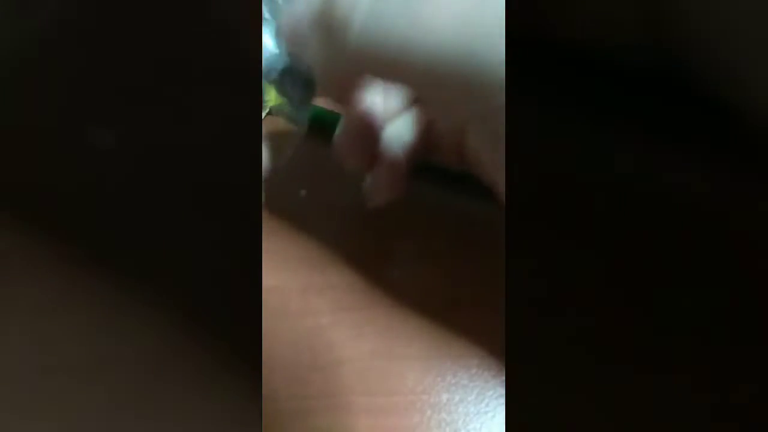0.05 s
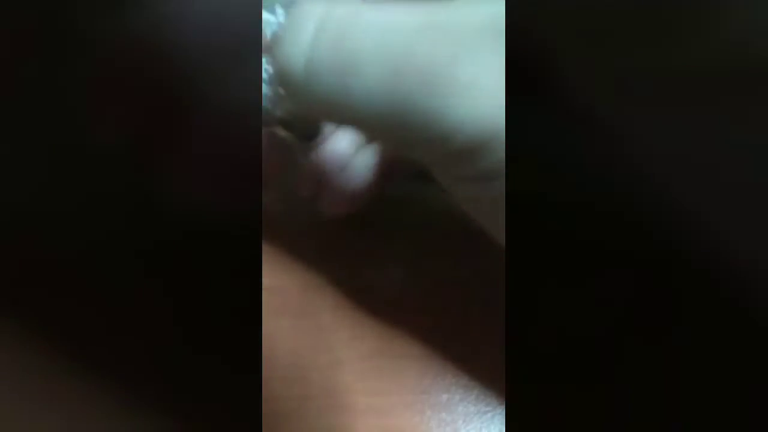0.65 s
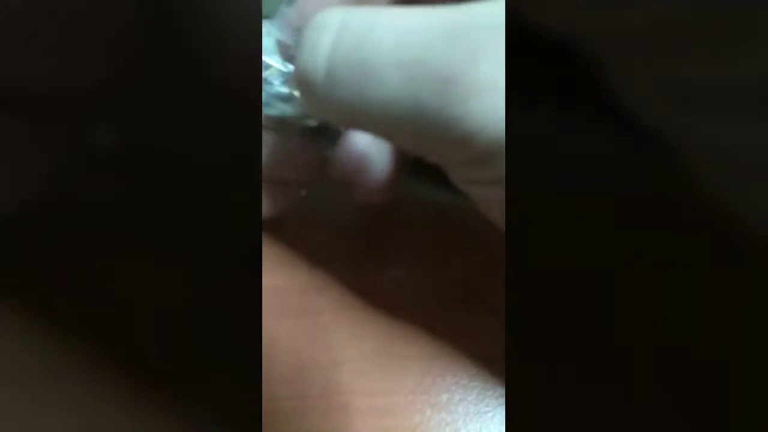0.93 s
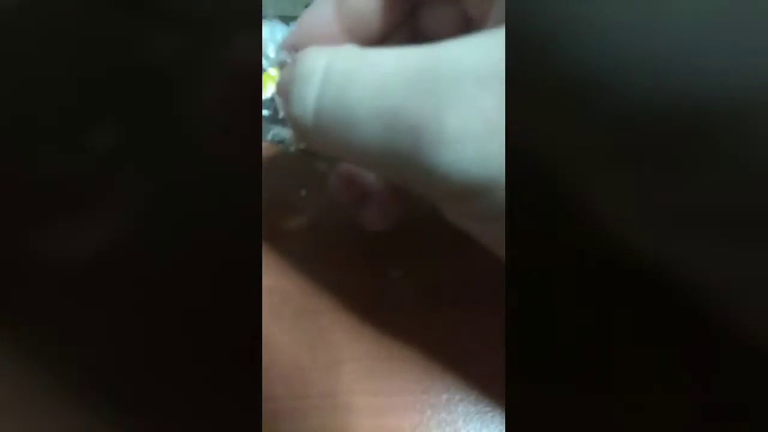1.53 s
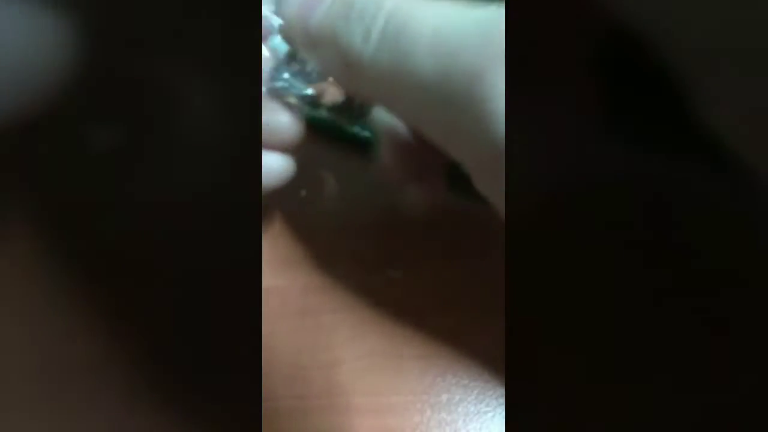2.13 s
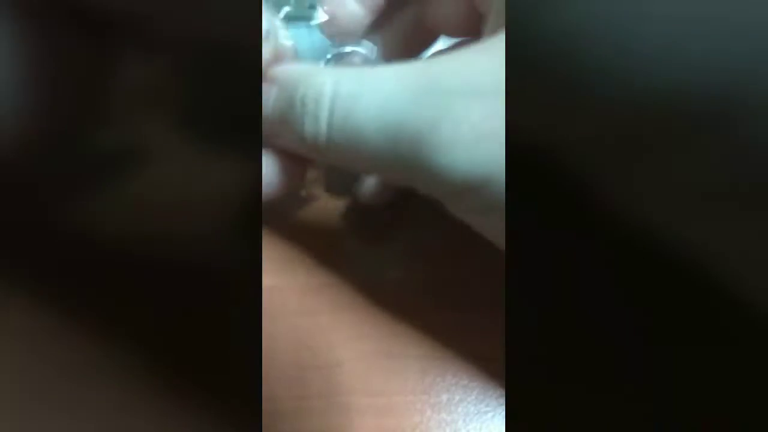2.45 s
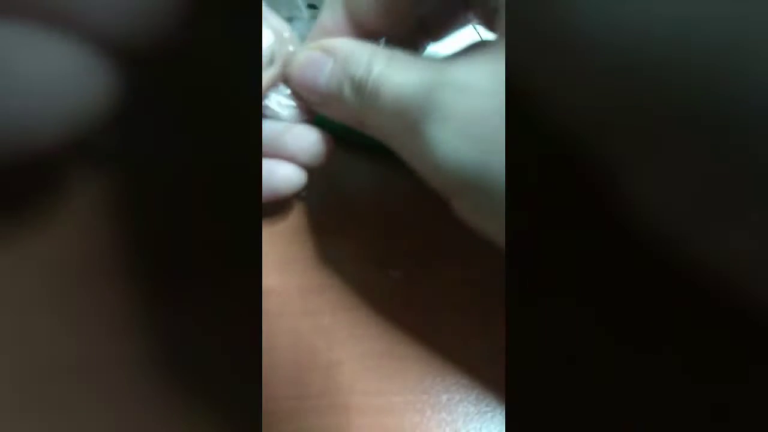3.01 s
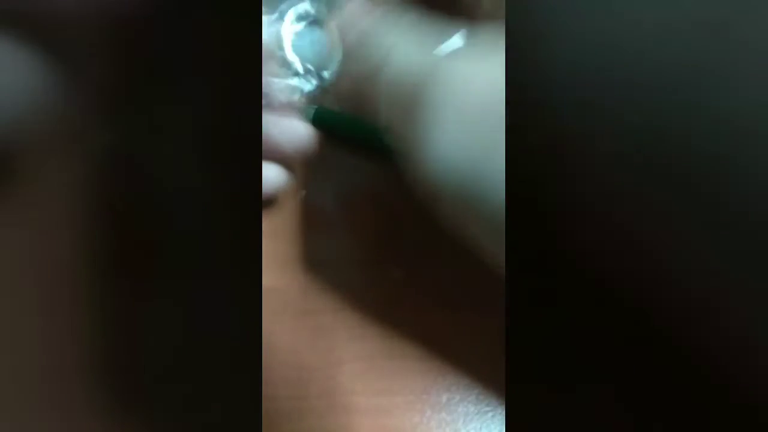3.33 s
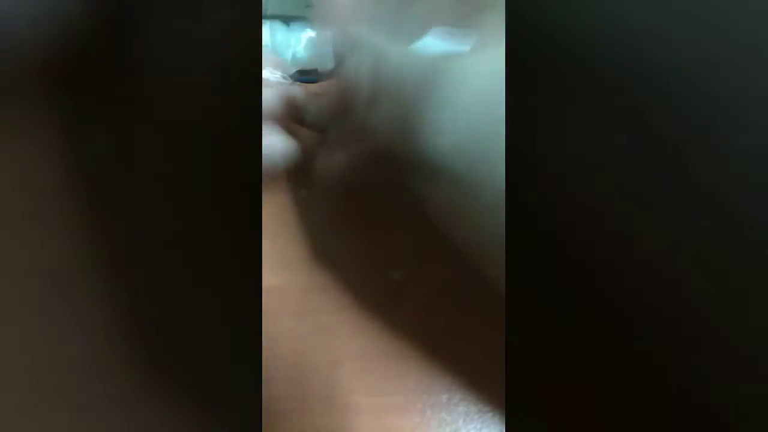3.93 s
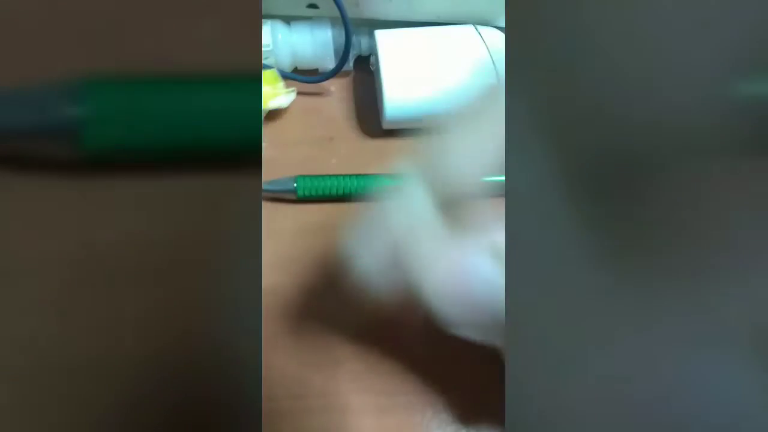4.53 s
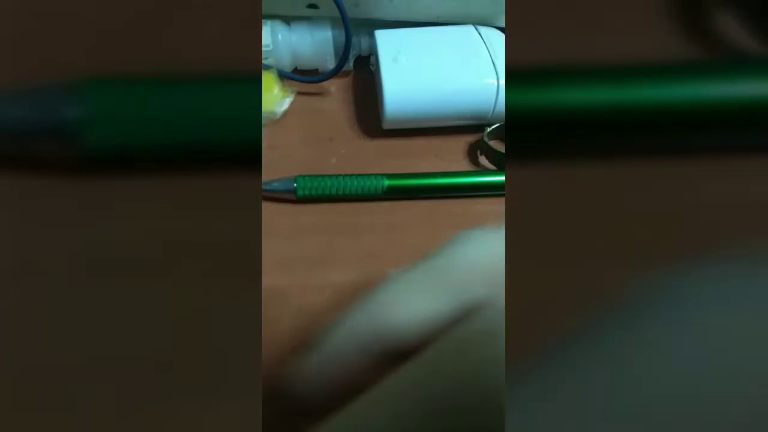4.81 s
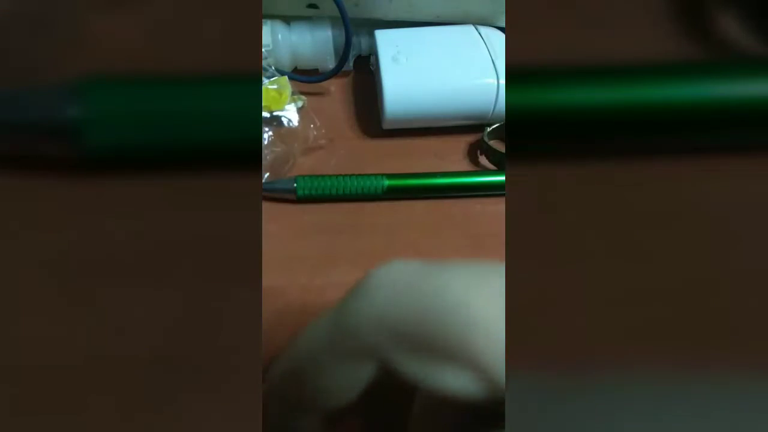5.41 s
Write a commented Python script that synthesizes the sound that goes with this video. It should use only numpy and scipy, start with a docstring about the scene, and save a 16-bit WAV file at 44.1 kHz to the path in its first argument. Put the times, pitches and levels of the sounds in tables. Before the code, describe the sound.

Very near the microphone in a quiet room, a stiff plastic packet is squeezed and pulled open by hand, crackling and snapping with each movement. Something small and hard, likely a sweet, then falls out, clinking and clacking on the desk and ending in a short dry rattle. Hands brush softly over the surface, the wrapper gives some last faint ticks, and a few light knocks finish the action.

```python
"""Unwrapping a sweet

A packet of stiff plastic film is crinkled and torn open by hand, close above a desk. Each squeeze
buckles tiny creases into a fine crackle, and single creases snap above it. Something small and hard,
likely a sweet, drops out, clinks and bounces; then the hands slide away and the wrapper settles.
Two microphone ports of unlike colour hear it from very near."""
import sys
import numpy as np
from scipy import signal
from scipy.fft import rfft, irfft
from scipy.io import wavfile
from scipy.ndimage import uniform_filter1d, minimum_filter1d

SR = 44100
rng = np.random.default_rng(int(sys.argv[2]) if len(sys.argv) > 2 else 0)


def store_wav(level_fs):
    """Save 16-bit WAV to argv[1]."""
    pcm = np.round(np.clip(np.atleast_2d(level_fs), -1, 1) * 32767)
    wavfile.write(sys.argv[1], SR, pcm.T.astype(np.int16))


N = 245195
TIME = np.arange(N) / SR
TAPS, LEVEL_WINDOW = 2048, .002 * SR  # samples: an impact response; the span of an impact's level
FREQS = np.maximum(np.fft.rfftfreq(TAPS, 1 / SR), 1)  # filter grid [Hz]
SIDES = np.array([[.5], [-.5]])  # left and right share of the contrast between the ports

# spectrum of buckling film: (frequency [Hz], level [dB])
FILM_SPECTRUM = [(100, -44), (600, -15.5), (1700, -6), (2700, -4.8), (4700, 3), (7500, 1.5), (11400, 2),
                 (15800, -11)]
# spectrum of an impact on the desk: (frequency [Hz], level [dB])
CLACK_SPECTRUM = [(90, -23), (170, -7.5), (1700, -0.5), (5500, -2.5), (11500, -4), (15500, -19)]
# left port relative to right port: (frequency [Hz], level [dB])
PORT_CONTRAST = [(1100, -3), (3700, -3.5), (8600, -1), (10000, 11), (11800, 11), (15000, 5)]
# fingers squeezing the film: (time [s], hold [s], crackle level [dB], fullness [dB])
SQUEEZES = [(0.003, 0.028, -18, -1.1), (0.129, 0.018, -29, 6), (0.225, 0.025, -20.5, 3),
            (0.425, 0.061, -23.5, -2.8), (0.655, 0.042, -17.5, 0), (0.736, 0.17, -16.5, -7),
            (1.004, 0.018, -18, -14.5), (1.067, 0.15, -26.5, -1), (1.264, 0.025, -26.5, 6.5),
            (1.462, 0.095, -21, 5), (1.61, 0.11, -16.5, -2), (1.784, 0.095, -28.5, -6),
            (2.07, 0.013, -27.5, 0), (2.132, 0.075, -21.5, -3), (2.291, 0.0033, -28, 0),
            (2.354, 0.056, -28, 4), (2.505, 0.018, -26.5, 3), (2.6, 0.025, -26, -4),
            (2.782, 0.014, -33, 15), (2.876, 0.09, -26, 6), (3.013, 0.16, -29, 4.7),
            (3.237, 0.063, -29.5, -1), (3.44, 0.045, -13, 4.5), (3.5, 0.025, -22, 6),
            (3.605, 0.055, -22, 6), (3.83, 0.06, -25.5, 7), (4.62, 0.08, -28.5, 4), (4.772, 0.07, -30.5, 4)]
# the light hold on the film between squeezes: (time [s], crackle level [dB])
LIGHT_TOUCH = [(0, -39.5), (3.35, -44.5), (4.9, -39.5), (5.27, -43), (5.34, -52), (5.47, -43)]


def from_db(db):
    """Amplitude ratio of a level in decibels."""
    return 10 ** (np.asarray(db) / 20)


def rms_one(x):
    """Normalisation to unit mean power."""
    return x / np.sqrt(np.mean(x ** 2) + 1e-20)


def in_time(rows):
    """An envelope in dB by linear interpolation, silent before its first point."""
    return np.interp(TIME, *np.transpose(rows), left=-200)


def at_hz(points):
    """A spectrum in dB by interpolation over log frequency."""
    hz, db = np.transpose(points)
    return np.interp(np.log(FREQS), np.log(hz), db)


def hump(hz, octaves):
    """A resonance peak: a Gaussian of height 1 over log frequency."""
    return np.exp(-(np.log2(FREQS / hz) / octaves) ** 2)


def wander(step_s):
    """Random modulation of rms 1, gliding to a new value every step."""
    values = rng.standard_normal(int(N / SR / step_s) + 2)
    return rms_one(np.interp(TIME / step_s, np.arange(len(values)), values))


def colour(x, db):
    """Minimum-phase filtering gives a short response its spectrum at each port, at unit mean energy."""
    cepstrum = irfft(np.log(from_db(db + at_hz(PORT_CONTRAST) * SIDES)))
    cepstrum[:, 1:TAPS // 2] *= 2  # folding the cepstrum makes the filter causal
    cepstrum[:, TAPS // 2 + 1:] = 0
    heard = irfft(rfft(x, TAPS) * np.exp(rfft(cepstrum)))
    return heard / np.sqrt(np.sum(heard ** 2) / 2)


def response(db, t60, rise_s=0.0015, lag_s=.0003):
    """Impulse response: scattered waves swell and decay exponentially, partly coherent at the ports."""
    age = TIME[:TAPS]
    waves = rng.standard_normal((2, TAPS)) + rng.standard_normal(TAPS)
    waves *= (1 - np.exp(-age / rise_s)) * from_db(-60 * age / t60)
    waves /= np.linalg.norm(waves, axis=1, keepdims=True)
    left_lag = int(lag_s * SR * rng.uniform(.5, 2))
    waves[0] = np.pad(waves[0], (left_lag, 0))[:TAPS]
    return colour(waves, db)


def strike(rows, make_response):
    """Superposition of impacts, each with a fresh impulse response."""
    out = np.zeros((2, N + TAPS))
    for s, db, *pitch in rows:
        at = int(np.clip(s * SR, 0, N))
        out[:, at:at + TAPS] += from_db(db) * np.sqrt(LEVEL_WINDOW) * make_response(*pitch)
    return out[:, :N]


def click_train(rate, spread_db=8, even_s=0.048):
    """A Poisson process of unequal clicks that share a steady supply of energy; rms about 1."""
    born = rng.random(N) < rate / SR
    sizes = from_db(spread_db * np.minimum(rng.exponential(1, N), 3))
    clicks = born * sizes * rng.choice([-1, 1], N)
    local_power = np.abs(uniform_filter1d(clicks ** 2, int(even_s * SR)))
    return clicks / np.sqrt(local_power + .5 * rate / SR)


def play(clicks, body):
    """Convolution of a click train with a stereo impulse response."""
    return signal.oaconvolve(clicks[None], body, axes=1)[:, :N]


def hiss(db):
    """Stereo white noise filtered to a given spectrum, rms 1."""
    return signal.oaconvolve(rng.standard_normal((2, N)), colour(np.ones(1), db), axes=1)[:, :N]


def effort(moves, tighten_db_per_s=732, relax_db_per_s=466):
    """Envelope in dB of hand movements: each tightens, holds and relaxes, and their powers add."""
    s, hold_s, db, *_ = np.transpose(moves)[:, :, None]
    time = TIME[::32]
    before_db = tighten_db_per_s * np.maximum(s - time, 0)
    after_db = relax_db_per_s * np.maximum(time - s - hold_s, 0)
    power = np.sum(from_db(db - np.minimum(before_db + after_db, 120)) ** 2, axis=0)
    return np.interp(TIME, time, 10 * np.log10(power))


def still_air(level_db=-59):
    """The noise floor: a faint, steady broadband hiss."""
    # spectrum of the quiet room: (frequency [Hz], level [dB])
    air_spectrum = [(140, -22), (300, -1), (420, -10), (850, -4), (3000, -11), (9000, -2), (15000, -14)]
    return from_db(level_db) * hiss(at_hz(air_spectrum))


def crease(pitch_hz=None, ring_db=4, body_db=4.5):
    """Snap-through buckling: a facet of film flips and rings briefly, small facets at a high pitch."""
    pitch_hz = pitch_hz or rng.uniform(6000, 12500)
    facet_db = ring_db * hump(pitch_hz, octaves=.19) + body_db * hump(pitch_hz, octaves=1.2)
    return response(at_hz(FILM_SPECTRUM) + facet_db, t60=rng.uniform(.006, .011), rise_s=.0003)


def flex(x):
    """Comb filtering: the packet's walls reflect the sound, and the delay shifts as they bend."""
    delay_s = .0008 * 2 ** (.5 * wander(step_s=.08))
    echo = np.array([np.interp(TIME - delay_s, TIME, port) for port in x])
    return x + .5 * echo


def crackle(median_per_s=290, rate_db_per_db=0.64, buckle_db=-45, friction_db=-10.5, count=14):
    """Above a buckling threshold tiny creases give way, faster under more force; below it film hisses."""
    level_db = np.maximum(effort(SQUEEZES), in_time(LIGHT_TOUCH))
    clicks = click_train(median_per_s * from_db(rate_db_per_db * (level_db - np.median(level_db))))
    cluster_db = 2 * wander(step_s=.009) - 1
    buckling = 1 / (1 + from_db(2 * (buckle_db - level_db)) ** 2)
    clicks *= from_db(level_db + cluster_db) * buckling
    facet = rng.integers(0, count, N)
    pitches_hz = np.geomspace(2300, 14500, count)
    fine = sum(play(clicks * (facet == k), crease(hz)) for k, hz in enumerate(pitches_hz))
    friction = hiss(at_hz(FILM_SPECTRUM) + 4 * hump(hz=9500, octaves=.5))
    return flex(fine + from_db(level_db + friction_db) * friction)


def folds(x, shelf_hz=3000):
    """Broad folds radiate lows better than small ones: each squeeze fills or thins the low crackle."""
    s, hold_s, _, fullness_db = np.transpose(SQUEEZES)
    squeezing = 1 / (1 + from_db(in_time(LIGHT_TOUCH) - effort(SQUEEZES)) ** 2)
    shelf_db = squeezing * np.interp(TIME, s + hold_s / 2, fullness_db)
    low = signal.sosfiltfilt(signal.butter(2, shelf_hz, fs=SR, output="sos"), x)
    return x + (from_db(shelf_db) - 1) * low


def snaps():
    """Single creases buckle, each releasing its elastic energy as one sharp transient."""
    # creases snapping: (time [s], level [dB], pitch [Hz] if the facet is broad)
    crease_snaps = [(.0224, -12), (.052, -17), (.0889, -18), (.1323, -15), (.2012, -10, 1670),
                    (.2443, -12, 3260), (.2758, -11.5, 1480), (.3805, -11), (.4157, -16), (.4269, -10.5),
                    (.4315, -15), (.4379, -8, 3940), (.4601, -9), (.5088, -14), (.5212, -7, 2900),
                    (.5591, -13.5), (.5781, -6, 2130), (.5998, -12), (.607, -11), (.6288, -11.5, 3280),
                    (.6415, -10), (.6637, -10), (.6901, -2.5), (.6977, -12), (.7378, -11, 4700),
                    (.7599, -11), (.9889, -10), (1.0677, -13), (1.0819, -11, 3000), (1.1071, -9, 3400),
                    (1.1785, -7, 3500), (1.2017, -10, 1850), (1.2725, -7.5, 1774), (1.4571, -15, 1830),
                    (1.5268, -10), (1.5382, -4.5, 2300), (1.6172, -6), (1.7413, -14), (1.7544, -14),
                    (1.7736, -9, 1510), (1.7928, -8, 1420), (1.797, -11), (1.8228, -14), (1.8652, -9, 1900),
                    (1.8736, -13), (1.9011, -4), (1.9337, -15.5), (1.9497, -13, 1550), (1.9619, -3),
                    (1.9811, -6.5), (2.036, -13.5), (2.1241, -12, 3600), (2.2024, -12.5), (2.2185, -12),
                    (2.2316, -12.5, 3630), (2.2421, -16), (2.3134, -13.7, 3540), (2.3583, -14.5, 3000),
                    (2.4134, -16.5), (2.4765, -14, 4200), (2.5194, -12, 3800), (2.5566, -16.5),
                    (2.6097, -14), (2.6147, -13), (2.7052, -8.5, 2800), (2.7709, -11, 3400),
                    (2.7806, -8.5, 1700), (2.7852, -16, 1900), (2.8537, -13.3), (2.9226, -16),
                    (2.9437, -12), (2.9654, -11), (2.9706, -8), (3.04, -13), (3.0612, -12), (3.1073, -14),
                    (3.1126, -9), (3.2116, -9), (3.2343, -10), (3.2408, -14), (3.4037, -12.5),
                    (3.5376, -10, 3560), (3.5422, -13), (3.5773, -11, 3210), (3.5888, -16), (3.6154, -13),
                    (3.6281, -11, 3500), (3.6444, -11), (3.6728, -15), (3.7209, -13.5, 2140), (3.7761, -15),
                    (3.7925, -8), (3.8172, -11, 4900), (3.8324, -12), (3.8554, -8), (3.8676, -8),
                    (3.8751, -13), (4.5955, -24), (4.8517, -23.5), (5.0083, -24)]
    return strike(crease_snaps, crease)


def knock(pitch_hz, body_db=11, low_cut_db_per_octave=7):
    """A damped transient: a soft, slow-rising noise burst around one pitch, with little far below it."""
    octaves_below = np.maximum(np.log2(.5 * pitch_hz / FREQS), 0)
    db = at_hz(CLACK_SPECTRUM) + body_db * hump(pitch_hz, octaves=.65)
    return response(db - low_cut_db_per_octave * octaves_below, t60=.045, rise_s=.005)


def thumps_and_knocks():
    """Damped transients: dull low thumps under loud crackles and snaps, soft desk knocks and scuffs."""
    # thumps, knocks and scuffs: (time [s], level [dB], pitch [Hz])
    soft_transients = [(0.653, -22, 110), (1.531, -25.5, 330), (1.981, -22.5, 91), (3.632, -7, 370),
                       (3.744, -26, 750), (4.628, -26, 600), (4.667, -19, 1300), (4.8137, -20, 900),
                       (5.25, -35, 900), (5.424, -20.5, 1600), (5.474, -31, 600), (5.5245, -14.5, 1560)]
    return strike(soft_transients, knock)


def pulls(half_width_hz=140):
    """Cavity resonance: as the packet is pulled wider its hollow grows and the scrape falls in pitch."""
    # pulls on the packet: (time [s], duration [s], level [dB], first pitch [Hz], last pitch [Hz])
    openings = [(2.912, .11, -42, 800, 300), (3.43, .11, -33, 900, 650)]
    lowpass = signal.butter(2, half_width_hz, fs=SR, output="sos")
    band = rms_one(signal.sosfilt(lowpass, rng.standard_normal((2, N))))
    out = np.zeros(N)
    for s, duration, db, first_hz, last_hz in openings:
        progress = np.sqrt(np.clip((TIME - s) / duration, 0, 1))  # fast at first
        phase = 2 * np.pi * np.cumsum(first_hz * (last_hz / first_hz) ** progress) / SR
        scrape = band[0] * np.cos(phase) + band[1] * np.sin(phase)
        out += from_db(db) * np.sin(np.pi * progress) * scrape
    return out * from_db(PORT_CONTRAST[0][1] * SIDES)


def desk():
    """Modal resonances of the desk colour whatever touches it; a spectrum in dB."""
    # resonances of the desk and the things on it: (frequency [Hz], height [dB])
    desk_modes = [(420, 4), (930, 7.5), (1880, 4.5), (4450, 7)]
    return sum(db * hump(hz, octaves=.16) for hz, db in desk_modes)


def sliding_hands(grip_db=3, slip_s=0.0024):
    """Stick-slip friction of sliding skin excites the desk's resonances."""
    # hands and packet sliding over each other and the desk: (time [s], hold [s], level [dB])
    slides = [(3.625, 0.03, -31), (3.98, 0.444, -36.5), (4.46, 0.24, -44.5)]
    # spectrum of rubbing skin: (frequency [Hz], level [dB])
    skin_spectrum = [(60, -31), (170, 9), (800, 16.5), (6000, -6)]
    slips = rms_one(uniform_filter1d(rng.standard_normal(N), int(slip_s * SR)))
    return from_db(effort(slides) + grip_db * slips) * hiss(at_hz(skin_spectrum) + desk())


def sweet_clacks():
    """Hard impacts excite the desk's modes; each bounce has a common ring and one of its own."""
    # the sweet bouncing: (time [s], level [dB])
    bounces = [(3.9512, -3), (3.9592, -1), (4.0229, -7), (4.0335, -2), (4.0522, -7), (4.085, -4.5),
               (4.1272, 4.5), (4.148, -5.5), (4.1738, -4), (4.2093, 0), (4.228, -5.5), (4.2664, -5),
               (4.2985, -7.5), (4.3176, -5)]
    clack_db = at_hz(CLACK_SPECTRUM) + desk()
    common_ring = .55 * response(clack_db, t60=.045)
    return strike(bounces, lambda: common_ring + response(clack_db, t60=.022, rise_s=.001))


def clink():
    """Free vibration: an early bounce sets something metallic ringing in damped, inharmonic modes."""
    # impacts that start the ring: (time [s], level [dB])
    hits = [(3.9595, -12)]
    # modes of the metal: (frequency [Hz], level [dB], time to fall 60 dB [s])
    metal_modes = [(5577, 0, .09), (8387, -10, .17), (10910, -9, .14)]
    ring = np.zeros((2, N))
    for s, db in hits:
        age = np.maximum(TIME - s, 0)
        for hz, mode_db, t60 in metal_modes:
            port_db = np.interp(hz, FREQS, at_hz(PORT_CONTRAST)) * SIDES
            decay_db = 60 * np.minimum(age / t60, 2)
            ring += from_db(db + mode_db + port_db - decay_db) * np.sin(2 * np.pi * hz * age)
    return ring


def sweet_rattle(peak_s=4.39, width_s=0.068, level_db=-14.3, per_face_per_s=300, count=4):
    """Rapid small impacts of the sweet's faces overlap into a dry rattle that swells and fades."""
    swell = from_db(level_db) * np.exp(-((TIME - peak_s) / width_s) ** 2)
    face_db = at_hz(CLACK_SPECTRUM) + .5 * desk()
    faces = (play(swell * click_train(per_face_per_s), response(face_db, t60=.025)) for _ in range(count))
    return flex(sum(faces) / np.sqrt(count))


def room(x, t60=0.25, level_db=-19):
    """Reverberation: diffuse reflections from the walls and nearby things decay exponentially."""
    age = TIME[:SR // 2]
    tail = rng.standard_normal((2, len(age))) * from_db(-60 * age / t60)
    tail /= np.linalg.norm(tail, axis=1, keepdims=True)
    return from_db(level_db) * signal.oaconvolve(x, tail, axes=1)[:, :N]


def scene():
    """Superposition of the direct sound, its faint reverberation and the still air."""
    wrapper = snaps() + folds(crackle()) + pulls()
    sweet = sweet_clacks() + clink() + sweet_rattle()
    near = wrapper + sweet + sliding_hands() + thumps_and_knocks()
    return near + room(near) + still_air()


def record(dry, threshold=0.8, cutoff_hz=15900):
    """Look-ahead limiting eases the sharpest peaks, the tallest still clip, and a low-pass cuts the top."""
    window = int(2 * LEVEL_WINDOW)
    allowed = np.sqrt(threshold / np.maximum(np.abs(dry), threshold))
    gain = uniform_filter1d(minimum_filter1d(allowed, window), window)
    clipped = np.clip(dry * gain, -.9, .9)
    return signal.sosfilt(signal.ellip(10, .2, 80, cutoff_hz, fs=SR, output="sos"), clipped)


dry = scene()
out = record(dry)
store_wav(out)
```